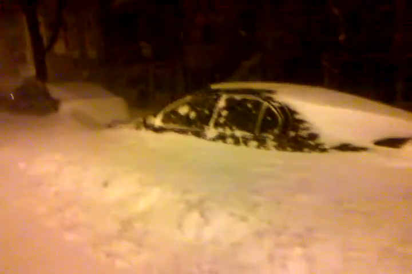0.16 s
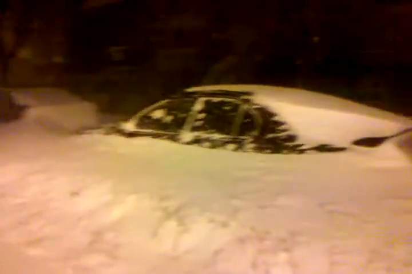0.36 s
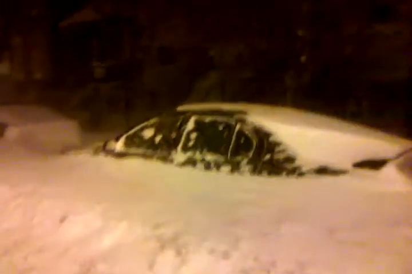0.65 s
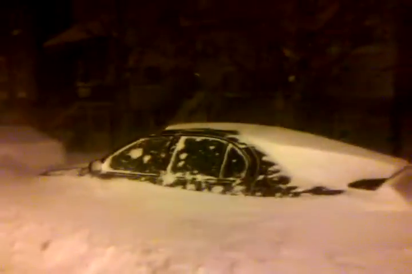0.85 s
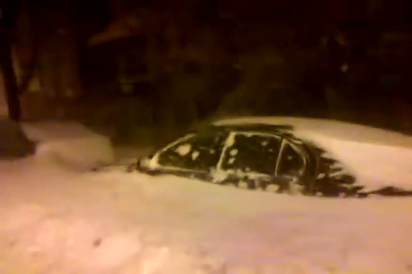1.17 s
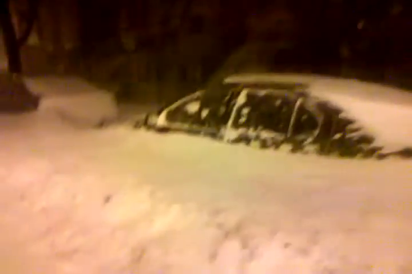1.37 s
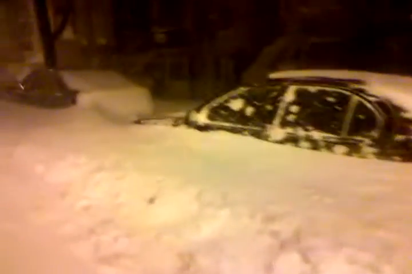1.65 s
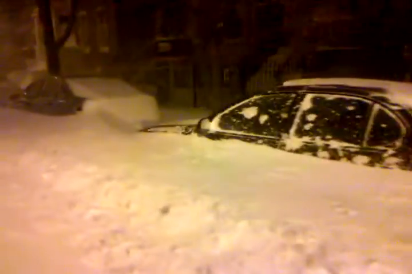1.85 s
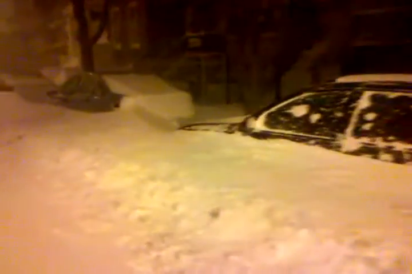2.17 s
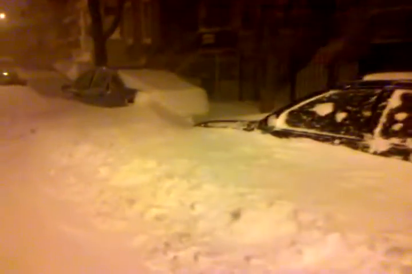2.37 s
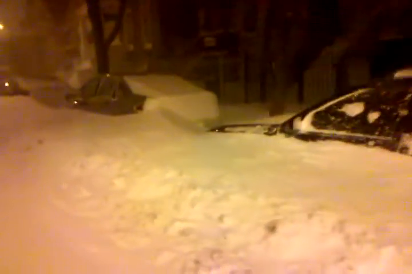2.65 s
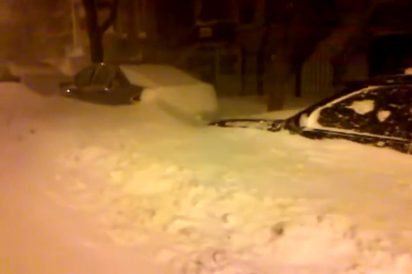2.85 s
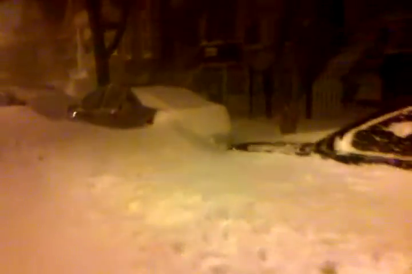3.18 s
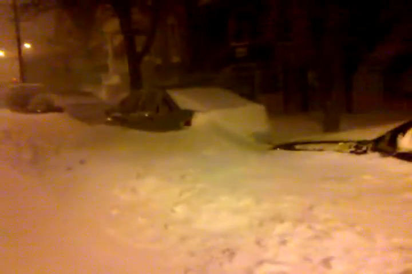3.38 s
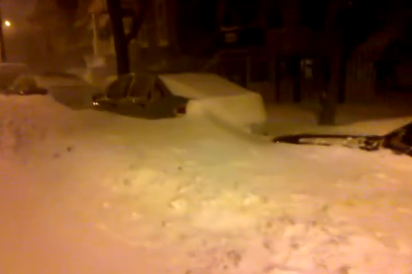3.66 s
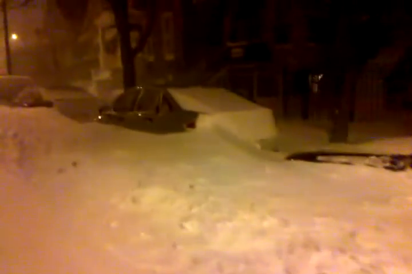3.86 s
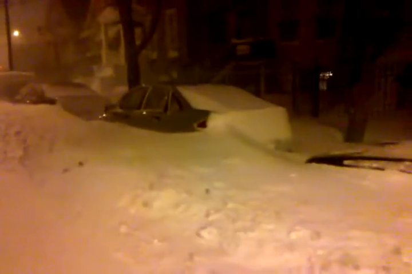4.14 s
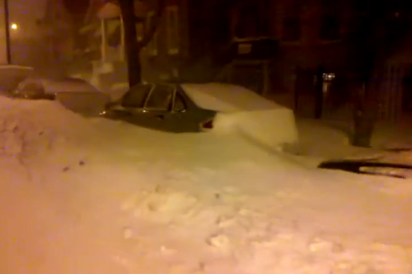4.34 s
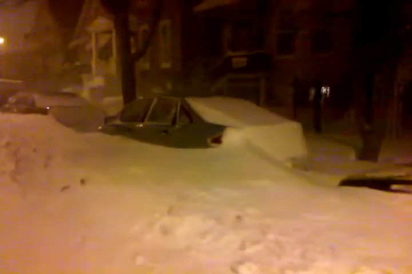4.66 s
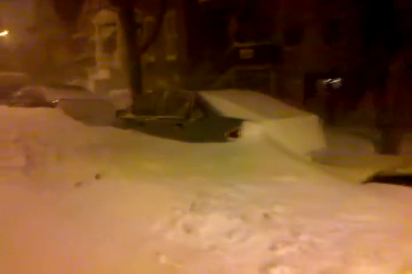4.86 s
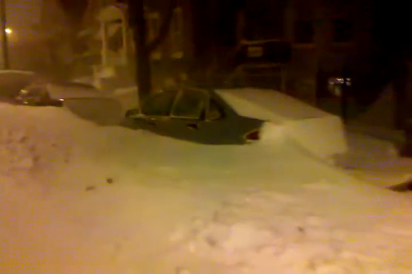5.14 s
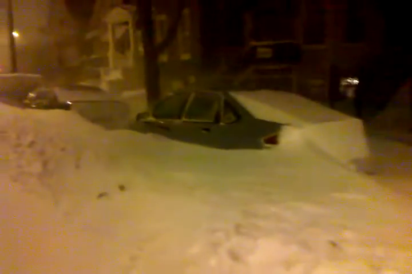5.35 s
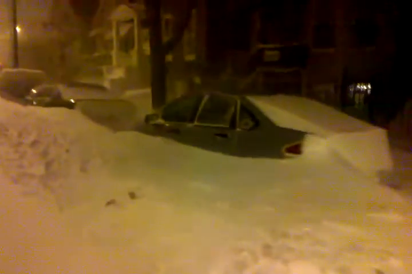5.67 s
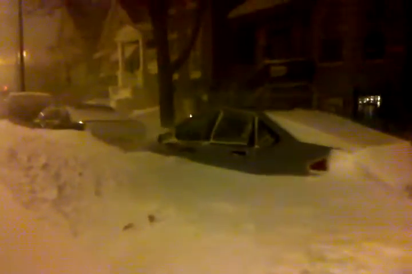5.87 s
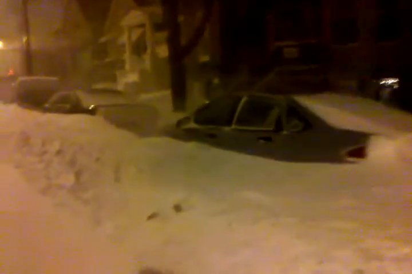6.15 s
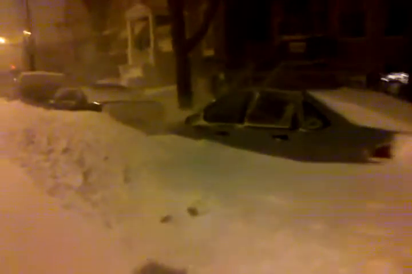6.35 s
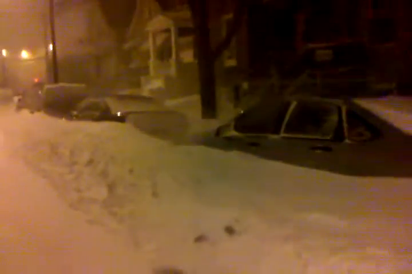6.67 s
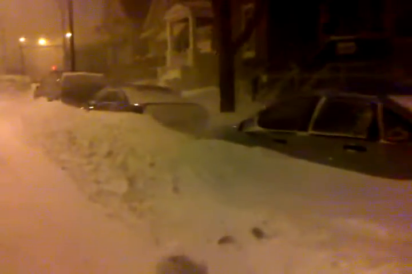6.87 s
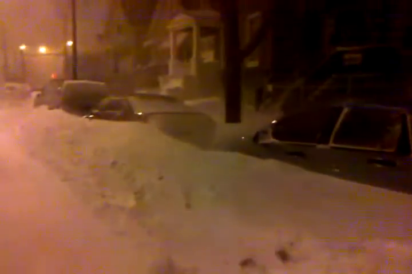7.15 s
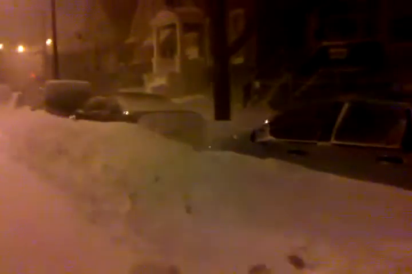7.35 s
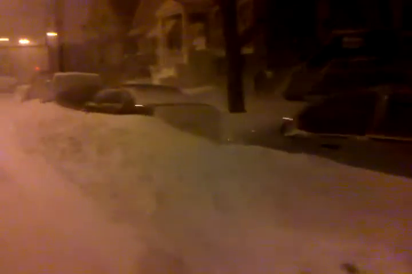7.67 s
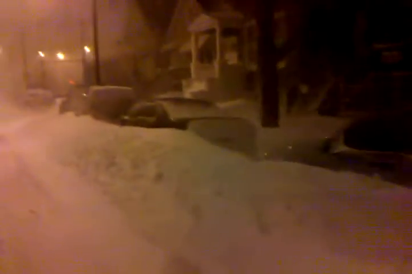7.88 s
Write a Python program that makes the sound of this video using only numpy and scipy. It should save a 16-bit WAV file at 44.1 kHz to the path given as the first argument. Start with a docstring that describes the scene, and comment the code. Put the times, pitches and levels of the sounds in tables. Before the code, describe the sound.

On a snowed-in street at night, gusty wind thumps and roars at a microphone, strongest early, easing, then swelling again, with fine icy crackle.

```python
"""Wind rumbles in lumps and rushes over a small hand-held camera in a blizzard on a snowed-in street.
Turbulence is shaped noise under gusts and lulls; driven snow and coarse ice ring the modes of the casing.
Slaps of air, about half of them in the early squall and the sharpest near the end, ring the microphone port.
Behind them lie an even far roar of noise and, later, a faint thin whistle of narrow noise that sinks in pitch."""
import sys
import numpy as np
from scipy import signal
from scipy.io import wavfile
from scipy.ndimage import uniform_filter1d

SR = 44100
rng = np.random.default_rng(int(sys.argv[2]) if len(sys.argv) > 2 else 0)


def file_out(sig):
    """Save sig as 16-bit WAV at sys.argv[1]."""
    # one column per channel
    cols = np.atleast_2d(sig).T
    # limit, then scale
    lim = np.clip(cols, -1, 1)
    pcm = np.round(lim * 32767).astype(np.int16)
    wavfile.write(sys.argv[1], SR, pcm)


N = 353549
TIME = np.arange(N) / SR   # seconds


def from_db(db):
    """Logarithmic level: 20 dB is a tenfold amplitude."""
    return 10 ** (np.asarray(db) / 20)


def rms_one(x):
    """Normalisation: scale a signal to unit rms."""
    return x / np.sqrt(np.mean(x ** 2) + 1e-20)


def in_time(rows):
    """Linear interpolation: each column of a curve, at every sample."""
    s, *columns = np.transpose(rows)
    return [np.interp(TIME, s, c) for c in columns]


def swells(s, db, width):
    """Superposition: Gaussian swells in dB add up, computed at every 20th sample and interpolated."""
    t = TIME[::20]
    bells = np.exp(-.5 * np.minimum(((t[:, None] - s) / width) ** 2, 100))
    return np.interp(TIME, t, bells @ db)


def drift(rate):
    """Low-pass noise: a smooth random signal of rms 1 that changes about rate times a second."""
    r = np.exp(-40 * np.pi * rate / SR)   # pole at a twentieth of the sample rate
    white = rng.standard_normal(N // 20 + 4002)
    slow = signal.lfilter([1], [1, -2 * r, r * r], white)[4000:]   # skip the onset
    return np.interp(np.arange(N) / 20, np.arange(len(slow)), rms_one(slow))


def ring(clicks, hz, t60):
    """Damped oscillator: a unit click starts a decaying sine of initial height 1."""
    r, w = from_db(-60 / (t60 * SR)), 2 * np.pi * hz / SR
    return signal.lfilter([0, np.sin(w)], [1, -2 * r * np.cos(w), r * r], clicks + 1e-18)


def resonate(x, hz, t60):
    """Cascaded resonance: two equal band-pass stages, each of decay t60, give a mode steep skirts."""
    r, w = from_db(-60 / (t60 * SR)), 2 * np.pi * hz / SR
    stage = [.5, 0, -.5, 1, -2 * r * np.cos(w), r * r]
    return (1 - r * r) * signal.sosfilt([stage, stage], x + 1e-18)


def coloured(spectrum):
    """Spectral shaping: half-octave noise bands follow a spectrum, scaled to rms 1."""
    hz, db = np.transpose(spectrum)
    out, white = 0, rng.standard_normal((2, N))   # neighbouring bands use different noise
    edges = 22 * 2 ** np.arange(0, 9.1, .5)
    for k, (low, high) in enumerate(zip(edges, edges[1:])):
        level = np.interp(np.log(low * high) / 2, np.log(hz), db)
        octaves_outside = max(0, np.log2(hz[0] / high), np.log2(low / hz[-1]))
        band_pass = signal.butter(2, [low, high], "band", fs=SR, output="sos")
        band = signal.sosfilt(band_pass, white[k % 2])
        out = out + band * from_db(level - 20 * octaves_outside)
    return rms_one(out)


def steady(x, seconds):
    """Short-time normalisation: divide by the running rms to even out slow swells."""
    return x / np.sqrt(uniform_filter1d(x ** 2, max(8, int(seconds * SR))) + 1e-12)


# Gusts that ride on the flow. Each row: centre in seconds, lift of the rumble in dB,
# lift of the rush in dB, standard deviation of the bell in seconds.
GUST_SWELLS = [(0.251, 2.5, 3, 0.016), (.348, 1, 1, 0.02), (.488, 5, 4, 0.0061), (.565, 6, 4, 0.018),
               (.597, 4, 1, 0.012), (.69, 5.5, 4, 0.024), (.79, 4, 2.5, .01), (.85, 6, 5, 0.019),
               (0.948, 7.5, 5, 0.026), (1.128, 5.5, -1.5, 0.019), (1.215, 10, 9, 0.015),
               (1.273, 14, 11.5, 0.0059), (1.363, 6, 5.5, 0.036), (1.632, 9, 0, 0.0043), (1.92, 2, -1, .02),
               (1.994, 3.5, 3.5, 0.039), (2.172, 3, 3, 0.019), (2.24, 3.5, 2.5, 0.022),
               (2.336, 2, 2.5, 0.031), (2.619, 3, 4, 0.024), (2.868, 3.5, 4, 0.032),
               (2.945, 1, 7.5, 0.0055), (3.04, 4, 1.5, 0.015), (3.13, 3.5, 0, 0.033),
               (3.261, 7.5, 7, 0.011), (3.53, 3.5, 5, 0.026), (3.6, 9, 9, 0.019), (3.758, 5, 9, 0.0048),
               (3.79, 4, 0.5, 0.067), (3.818, 2.5, 7, 0.0089), (3.868, 2, 3.5, 0.018),
               (4.155, 7.5, 1, 0.012), (4.227, 9, 7, 0.02), (4.345, 5, 4, 0.011), (4.405, 5, -1.5, 0.03),
               (4.484, 7.5, 4.5, 0.012), (4.752, 5.5, 6, 0.011), (4.921, 9, 2, 0.004), (5.029, 7, 2, 0.011),
               (5.191, 9.5, 3, 0.0095), (5.33, 3.5, 2, 0.024), (5.79, 5, 1.5, 0.047), (6.168, 7.5, 0, .011),
               (6.655, 5.5, 2, 0.025), (6.856, 8.5, 6.5, 0.013), (6.945, 4, 1, .015), (7, 3, 5.5, 0.019),
               (7.115, 0, -1, 0.041), (7.16, 4.5, -1, .012), (7.27, 6, 3, 0.018), (7.36, 2, 3.5, 0.022),
               (7.61, 1, -1, 0.029), (7.828, 11, 8, 0.018), (7.878, 7, 12, 0.017), (7.995, 4, 1, 0.011)]


def gust_lift():
    """Gusting: one set of bells lifts the rumble and the rush by different dB."""
    s, rumble_db, rush_db, width = np.transpose(GUST_SWELLS)
    return [swells(s, db, width) for db in (rumble_db, rush_db)]


# Strength of the wind at the port: an early squall, a long easing, a rise at the end.
# Each row: time in seconds, relative level in dB.
WIND_FLOW = [(-0.0, -30.5), (0.45, -29.5), (0.55, -25), (0.95, -27.5), (1.01, -28), (1.22, -23.5),
             (1.39, -23), (1.53, -29.5), (2.34, -32), (2.45, -33.5), (3.5, -35), (5.13, -36), (5.4, -43),
             (6.01, -43.5), (6.91, -39), (7.54, -37.5), (8.02, -30.5)]
# Lulls in which the air slackens. Each row: centre in seconds, drop in dB, standard deviation in seconds.
WIND_LULLS = [(.1, 4.5, 0.027), (.19, 2, 0.031), (.435, 3, 0.018), (1.025, 1.5, .018), (1.78, 2, 0.026),
              (2.09, 2.5, 0.025), (2.465, 3.5, .022), (2.765, 3.5, 0.071), (3.445, 2.5, 0.021),
              (3.97, 2, 0.023), (5.27, 1.5, 0.015), (5.91, 2.5, 0.04), (6.04, 3.5, 0.028),
              (6.47, 2.5, 0.021), (6.81, 4, .015), (7.055, 4, 0.012), (7.19, 3.5, 0.03), (7.48, 3, 0.074)]
# Spectra of the rumble, the rush and the thin hiss. Each row: frequency in Hz, relative density in dB per Hz.
RUMBLE_SPECTRUM = [(25, -57), (40, -29.5), (62, -20), (100, -5), (170, 2.5), (250, -4), (320, -4.5),
                   (450, -9.5), (600, -14), (850, -20.5), (1500, -60.5)]
RUSH_SPECTRUM = [(350, -22), (520, 3.5), (780, 1.5), (1150, 2), (1600, -0.3), (2300, -6.5), (3100, -12)]
HISS_SPECTRUM = [(3000, -1), (4500, -1), (7500, -16.5)]
RUSH_FOLLOWS = 0.86   # dB of rush for each dB of flow
RUSH_TOP_HZ, HISS_DB = 2494, -17.5   # the rush ends steeply; only the hiss lies above it
FILL_HZ, FILL_T60_S, FILL_DB = 2204, 0.0038, -18   # narrow band of noise that fills out the top of the rush
GRIT_HZ = (1500, 5000)   # band of the air that tears at the port's edge


def wind(lump_db, flutter_db, swirl_db, unrest_db, rumble_db, rush_db, tear_above, tear_db):
    """Turbulence: flow moves rumble and rush, pressure flutters the rush, strong pushes tear into grit."""
    level = in_time(WIND_FLOW)[0] - swells(*np.transpose(WIND_LULLS)) + unrest_db * drift(4.4)
    rumble_lift, rush_lift = gust_lift()
    lumps = lump_db * drift(29)
    rumble = steady(coloured(RUMBLE_SPECTRUM) * from_db(lumps), 0.051)
    pressure = rumble * from_db(level + rumble_lift + rumble_db)

    flutter = flutter_db * drift(150) + swirl_db * np.minimum(np.abs(rumble), 3)
    fill = from_db(FILL_DB) * rms_one(resonate(rng.standard_normal(N), FILL_HZ, FILL_T60_S))
    low_pass = signal.butter(8, RUSH_TOP_HZ, fs=SR, output="sos")
    body = signal.sosfilt(low_pass, coloured(RUSH_SPECTRUM) + fill)
    hissing = body + from_db(HISS_DB) * coloured(HISS_SPECTRUM)
    rush = steady(hissing * from_db(0.32 * lumps + flutter), 0.052)
    rush = rush * from_db(RUSH_FOLLOWS * level + rush_lift + rush_db)

    grit_band = signal.butter(1, GRIT_HZ, "band", fs=SR, output="sos")
    grit = rms_one(signal.sosfilt(grit_band, rng.standard_normal(N)))
    tearing = from_db(tear_db) * grit * np.maximum(pressure - tear_above, 0)
    return pressure + tearing + rush


# Density of the driven snow on the casing. Each row: time in seconds, level before gusts and flurries in dB.
SNOW_DENSITY = [(0, -46.5), (.4, -45.5), (1.0, -49.5), (1.3, -49), (1.55, -49), (1.7, -44.5), (2.3, -49.5),
                (2.5, -48), (2.95, -48), (3.45, -50), (3.6, -54), (3.8, -49), (4.15, -73.5), (4.28, -59),
                (4.6, -51.5), (5.07, -48.5), (5.11, -63), (5.2, -57.5), (5.27, -46.5), (5.45, -57.5),
                (5.66, -53), (6.0, -60), (6.2, -52.5), (6.8, -59.5), (6.97, -46), (7.2, -51.5), (8.02, -48)]
# Resonances of the casing, rung by snow and by ice grains. Each row: frequency in Hz, relative level in dB,
# t60 of each filter stage in seconds, register (0 knock, 1 click, 2 tick, 3 ping; rounded when used).
CASING_MODES = [(1520, -2.5, 0.0056, 0), (2110, -7, 0.003, 0.5), (2920, -4, 0.0032, 1),
                (3660, -3, 0.002, 1), (4880, 0.5, 0.0018, 2), (5700, -9, 0.0019, 2), (6710, 3, 0.0015, 3)]
SNOW_PER_GUST = 0.5   # dB of snow for each dB that gusts add to the rush
SPOTS = 4   # places on the casing, each with its own tuning


def snow(per_s, spread_db, clump_db, flurry_db, scatter, knock_db, click_db, tick_db, ping_db):
    """Random impact excitation: many small crystals strike the modes, each with strengths of its own."""
    level = in_time(SNOW_DENSITY)[0] + SNOW_PER_GUST * gust_lift()[1] + flurry_db * drift(6.0)
    rate = per_s * from_db(0.5 * (level - level.mean()))   # thicker snow, more hits
    born = rng.random(N) < rate / SR
    size_db = spread_db * np.minimum(rng.exponential(1, N), 4) + clump_db * drift(66)
    sizes = born * from_db(size_db)
    out, spot = 0, rng.integers(0, SPOTS, N)
    register_db = (knock_db, click_db, tick_db, ping_db)
    for hz, db, t60, register in CASING_MODES:
        gain = from_db(db + register_db[int(round(register))])
        hits = gain * sizes * rng.uniform(-0.96, 1, N)
        for k, shift in enumerate(np.linspace(-scatter, scatter, SPOTS)):
            out = out + resonate(hits * (spot == k), hz * (1 + shift), t60)
    return steady(out, 0.079) * from_db(level)


# Spectrum of the far storm. Each row: frequency in Hz, relative density in dB per Hz.
FAR_SPECTRUM = [(60, -4), (160, 5), (300, 0.5), (550, -17.5), (1200, -24), (2500, -44.5), (4500, -28),
                (7500, -25)]


def far_storm(level_db):
    """Stationary noise: the even roar of the street has a fixed spectrum and level."""
    return from_db(level_db) * coloured(FAR_SPECTRUM)


# Coarse ice grains on the casing. Each row: time in seconds, then the relative levels in dB
# of the low knock, the middle click, the high tick and the top ping.
GRAIN_HITS = [(0.0722, -58, -34, -19, -33), (0.123, -46, -48, -42, -50), (0.16, -36, -57, -45, -30),
              (0.258, -36, -41, -40, -43), (0.3906, -39, -31.5, -34, -27), (0.521, -49, -37, -29, -40),
              (0.5833, -52, -40, -39, -44), (0.626, -33.5, -37, -41, -40), (0.786, -30.5, -66, -34.5, -38),
              (0.9496, -50, -47, -36, -42), (1.0574, -52, -60, -36.5, -50), (1.0904, -47, -46, -37, -45),
              (1.1163, -30, -40, -33, -50), (1.1455, -44, -57, -32, -40), (1.338, -50, -43, -34, -35),
              (1.4207, -42, -45, -39, -43), (1.4388, -16.5, -29.5, -24.5, -26.5),
              (1.702, -55, -38, -39, -38), (2.092, -43, -58, -33.5, -34), (2.2389, -50, -36, -29, -34),
              (2.348, -36, -57, -40, -42), (2.4314, -50, -46, -45, -50), (2.459, -39, -46, -41, -42),
              (2.8657, -56, -43.5, -37, -45), (2.936, -50, -45, -38, -47), (2.984, -47, -52, -39, -42),
              (3.116, -41, -49, -40, -41), (3.2906, -36.5, -49, -36.5, -36), (3.3456, -43, -39, -37, -38),
              (3.6507, -56, -37.5, -33, -34.5), (4.428, -41, -42, -44, -44), (4.51, -44, -55, -38, -36),
              (4.603, -50, -46, -43, -43), (4.6663, -39, -41, -47, -39.5), (4.891, -50, -40, -42, -46),
              (4.9247, -46, -48, -44, -54), (4.995, -41, -44, -41, -51), (5.11, -53, -51, -46, -52),
              (5.1703, -50, -45, -55, -49), (5.226, -46, -48, -43, -41), (5.3168, -40, -46, -37, -42),
              (5.373, -38.5, -46, -52, -33.5), (5.6431, -55, -50, -47, -50),
              (5.809, -47, -43, -39.5, -37.5), (6.075, -58, -51, -43.5, -46), (6.101, -37, -43.5, -55, -52),
              (6.12, -42, -51, -44, -58), (6.1792, -57, -51, -45, -38), (6.1852, -31.5, -44, -35, -39),
              (6.313, -44, -49, -49, -49), (6.406, -62, -45, -46, -39), (6.448, -60, -40, -48, -56),
              (6.6401, -34.5, -43, -49, -37), (6.6448, -43, -37.5, -43, -53), (6.998, -43, -46, -42, -38),
              (7.0868, -56, -51, -43, -45), (7.203, -51, -43, -55, -46), (7.2519, -50, -48, -44, -49),
              (7.352, -50, -47, -46, -43), (7.3676, -36.5, -52, -54, -36), (7.3987, -57, -51, -37, -47),
              (7.4333, -55, -51, -43, -47), (7.453, -37.5, -41, -31.5, -39), (7.474, -55, -50, -43, -48),
              (7.576, -58, -44, -43, -53), (7.6503, -48, -38, -44, -46), (7.667, -40, -40, -56, -53),
              (7.7445, -52, -51, -41, -41), (7.832, -40, -35, -32, -30.5), (7.8773, -33, -50, -47, -31),
              (7.9356, -51, -39.5, -54, -48)]
DETUNE = 0.022   # largest share by which the spot that is hit shifts the casing's pitch


def ice_grains(strength_db, rebound_s, rebound_db):
    """Modal impact: a grain touches twice and rings the casing in a colour of its own and a random tuning."""
    out = np.zeros(N + SR)
    places = rng.uniform(-0.82, 1, (len(GRAIN_HITS), 2))
    for (s, *register_db), (spot, hop) in zip(GRAIN_HITS, places):
        at, touches = round(s * SR), signal.unit_impulse(SR // 20)
        rebound_at = round(rebound_s * (1 + .5 * hop) * SR)
        touches[rebound_at] += from_db(rebound_db)
        for n, (hz, db, t60, register) in enumerate(CASING_MODES):
            gain = from_db(strength_db + db + register_db[int(round(register))])
            phase = (-1) ** n   # neighbouring modes swing in opposite phase
            mode = resonate(touches, hz * (1 + DETUNE * spot), t60)
            out[at:at + len(touches)] += phase * gain * mode
    return out[:N]


# Slaps of air on the port. Each row: time in seconds, strength in dB, ring in Hz, t60 in seconds,
# level of the crack against the thump in dB.
AIR_SLAPS = [(0.5619, -8.5, 250, 0.016, -21), (.586, -15, 220, 0.014, -22), (1.201, -15, 270, 0.022, -7),
             (1.218, -7, 206, 0.033, -13.5), (1.2715, -3, 166, 0.069, -24), (1.336, -9, 178, 0.028, -20),
             (1.3613, -5, 252, 0.045, -27), (1.994, -20, 362, 0.031, -19), (3.6, -24, 330, .016, -21),
             (3.755, -23, 260, 0.015, -20), (3.817, -16, 402, .012, -24), (4.217, -19.5, 210, 0.045, -23),
             (6.845, -23, 230, 0.029, -20), (7.7112, -5, 143, 0.026, -2), (7.8253, -30, 159, 0.039, -21)]
# Resonances of the port. Each row: frequency in Hz, relative level in dB, t60 of each filter stage in seconds.
PORT_MODES = [(520, 1, 0.0081), (1410, 0.5, 0.0017), (2620, -5.5, 0.0051), (3150, -5.5, 0.0055),
              (5380, -1.5, 0.0022), (6830, 2, 0.0016)]


def slaps(suction_s, suction_db, crack_lead_s):
    """Impulse response: a crack rings the port, a brief suction follows, then a damped thump swings back."""
    out, half = np.zeros(N + SR), SR // 10
    click = signal.unit_impulse(2 * half, half)
    t = np.arange(-half, half) / SR
    suction = from_db(suction_db) * np.exp(-.5 * np.minimum((t / suction_s) ** 2, 100))
    early = np.roll(click, -round(crack_lead_s * SR))
    crack = 0
    for n, (hz, db, t60) in enumerate(PORT_MODES):
        crack = crack + (-1) ** n * from_db(db) * resonate(early, hz, t60)
    for s, db, hz, t60, crack_db in AIR_SLAPS:
        at = round(s * SR)
        slap = ring(click, hz, t60) - suction + from_db(crack_db) * crack
        out[at - half:at + half] += from_db(db) * slap
    return out[:N]


WHISTLE_FROM_S, WHISTLE_HZ, WHISTLE_SAG_HZ_PER_S2 = 2.8, 7670, 71   # sinks ever faster
WHISTLE_DB, WHISTLE_LOUDEST_S, WHISTLE_FADE_DB_PER_S = -59, 6.9, 4.5


def whistle(width_hz, waver_hz):
    """Narrow-band noise: two slow random signals in quadrature make an unsteady line that glides down."""
    age = np.maximum(TIME - WHISTLE_FROM_S, 0)
    hz = WHISTLE_HZ - WHISTLE_SAG_HZ_PER_S2 * age ** 2
    level = WHISTLE_DB - WHISTLE_FADE_DB_PER_S * np.abs(TIME - WHISTLE_LOUDEST_S)
    gain = np.minimum(age, 1) * from_db(level)   # enters over one second
    phase = 2 * np.pi * np.cumsum(hz + waver_hz * drift(15)) / SR
    line = drift(width_hz) * np.cos(phase) + drift(width_hz) * np.sin(phase)
    return gain * rms_one(line)


def scene():
    """Superposition: wind, snow, ice and slaps at the microphone over the far roar and the whistle."""
    near = wind(lump_db=2.0, flutter_db=2.0, swirl_db=2.0, unrest_db=0.5,
                rumble_db=0.5, rush_db=-13.5, tear_above=0.094, tear_db=-18)
    near = near + snow(per_s=1000, spread_db=3.0, clump_db=3.5, flurry_db=2.4, scatter=0.09,
                       knock_db=-9, click_db=-6.0, tick_db=-3.0, ping_db=-3.0)
    near = near + ice_grains(strength_db=16.0, rebound_s=0.0012, rebound_db=-9.0)
    near = near + slaps(suction_s=0.00057, suction_db=-4.5, crack_lead_s=0.00048)
    far = far_storm(level_db=-49.5) + whistle(width_hz=65, waver_hz=44.7)
    return (near + far)[None]


MIC_LOW_HZ, MIC_TOP_HZ, TOP_LEAK_DB, CUTOFF_HZ = 50.6, 6880, -19.5, 8700


def record(dry):
    """Band limiting and saturation: deep bass is shed, peaks round, treble drops to a shelf, then is cut."""
    x = signal.sosfilt(signal.butter(3, MIC_LOW_HZ, "high", fs=SR, output="sos"), dry)
    top = 0.92   # ceiling of the rounded peaks
    x = top * np.tanh(x / top)
    leak = from_db(TOP_LEAK_DB) * x   # leaves a faint shelf above the steep low-pass
    x = signal.sosfilt(signal.butter(22, MIC_TOP_HZ, fs=SR, output="sos"), x) + leak
    return signal.sosfilt(signal.butter(24, CUTOFF_HZ, fs=SR, output="sos"), x)


dry = scene()
out = record(dry)
file_out(out)
```